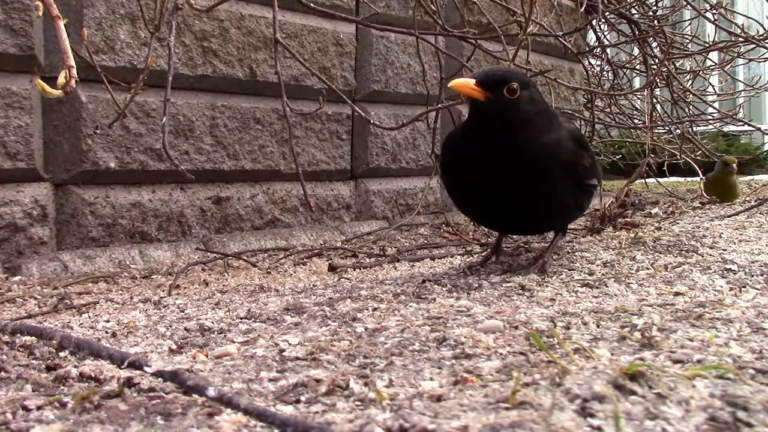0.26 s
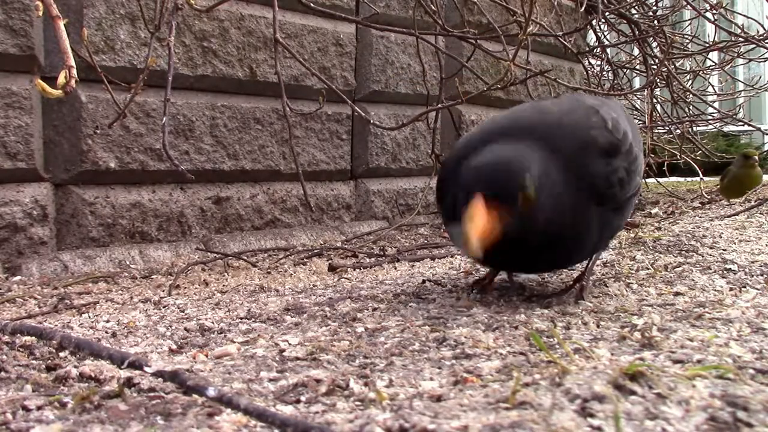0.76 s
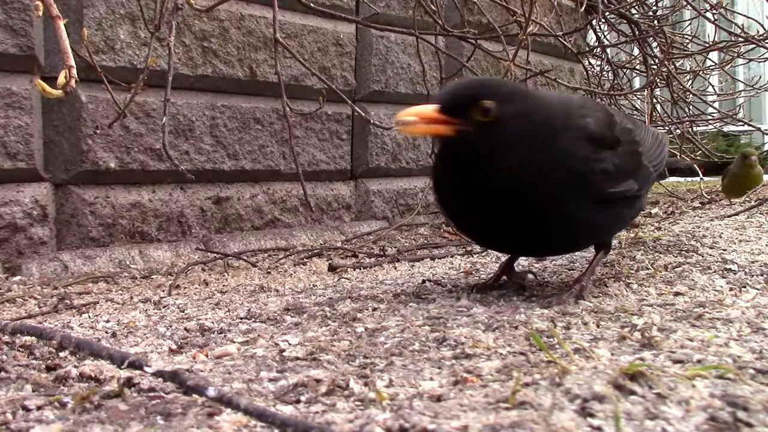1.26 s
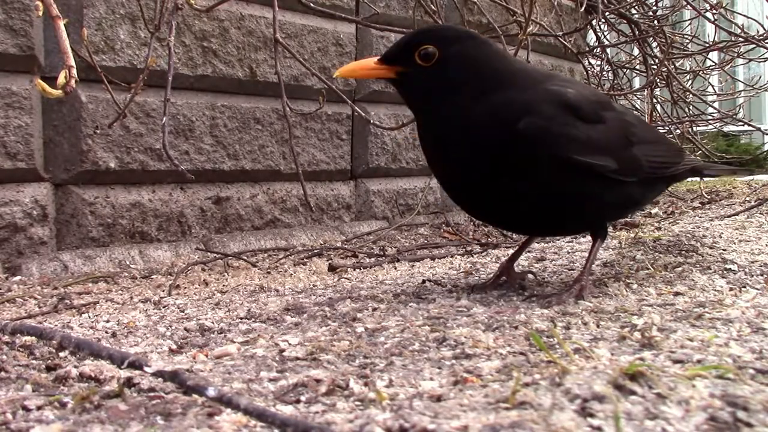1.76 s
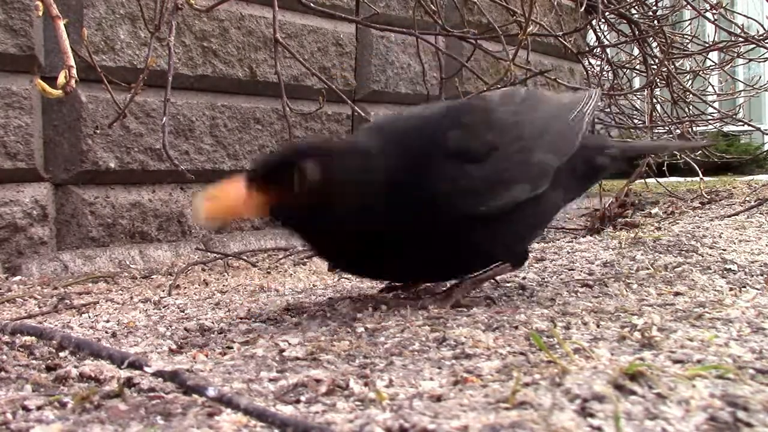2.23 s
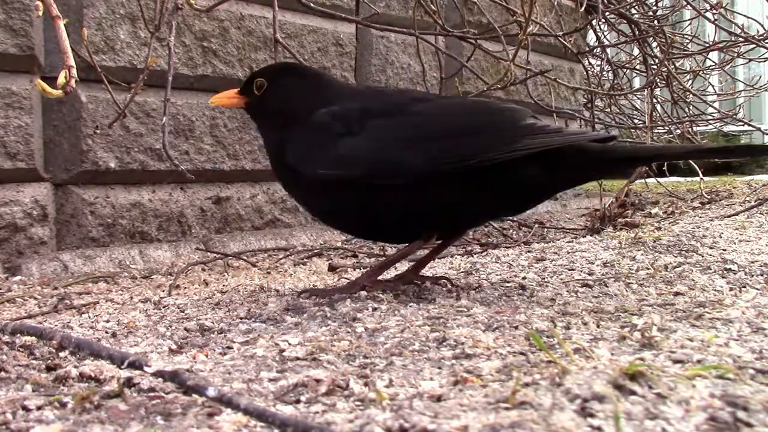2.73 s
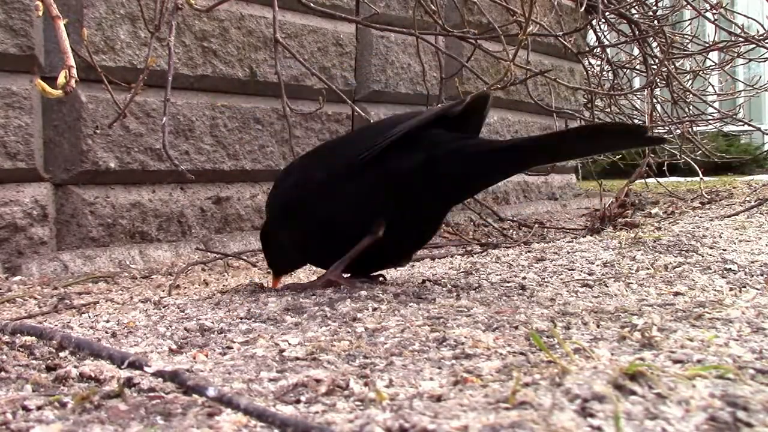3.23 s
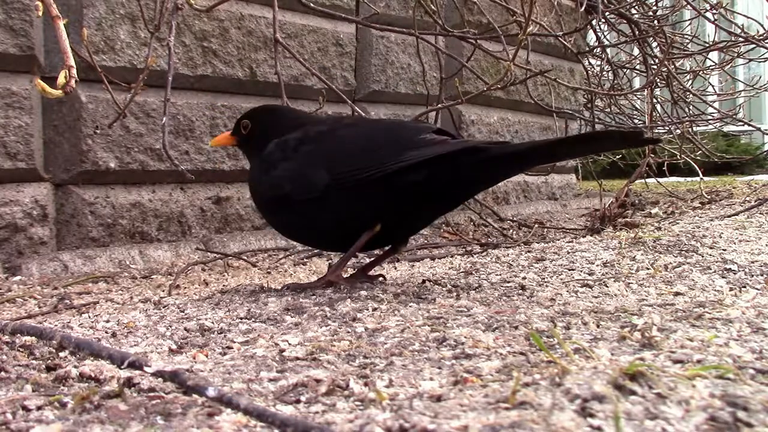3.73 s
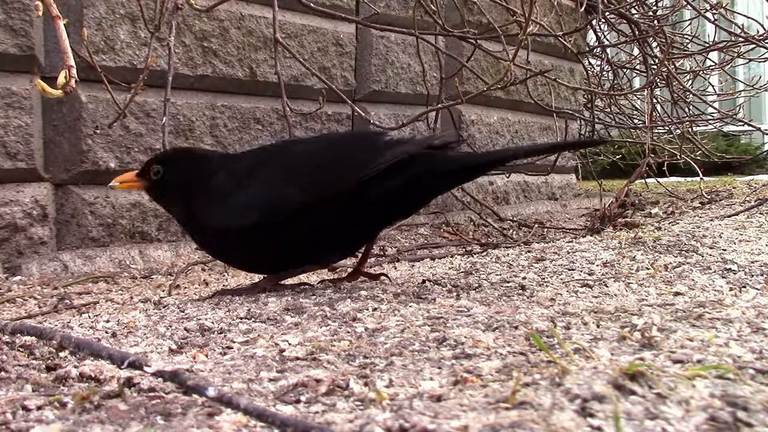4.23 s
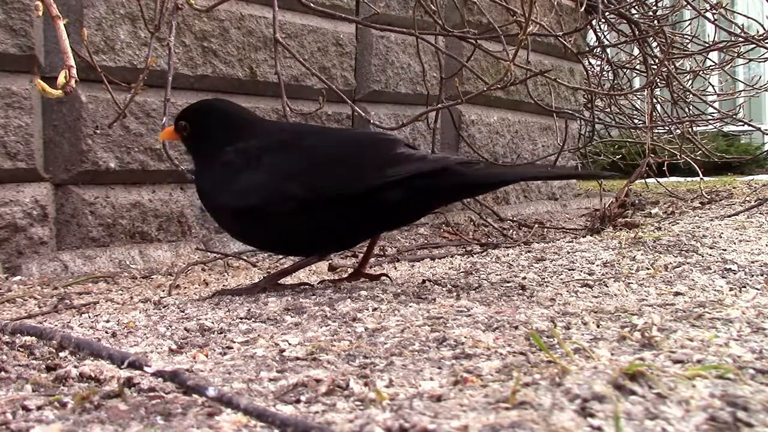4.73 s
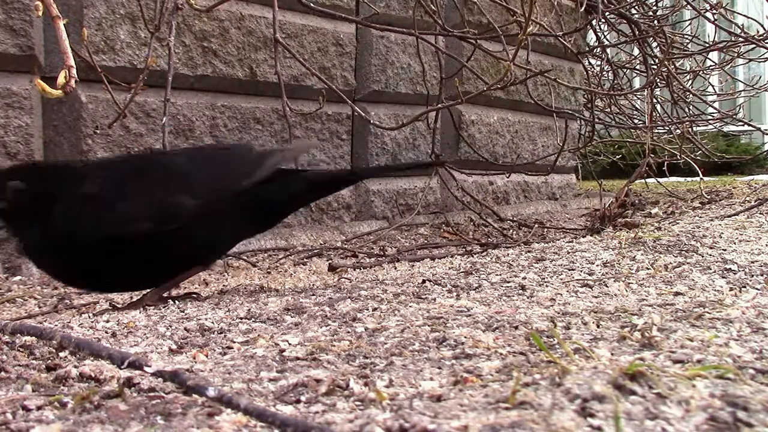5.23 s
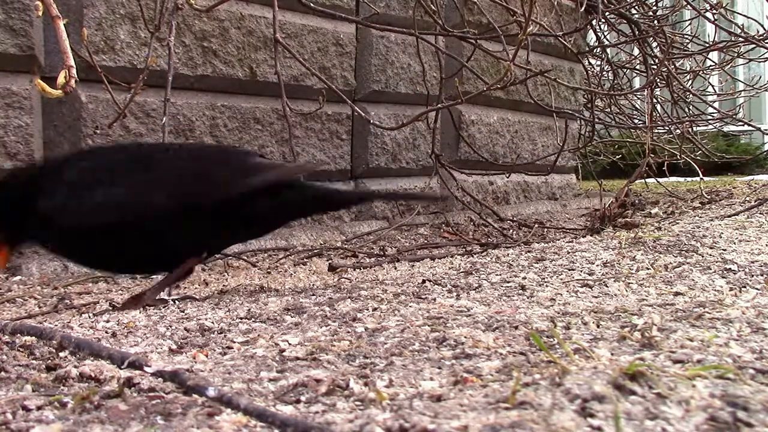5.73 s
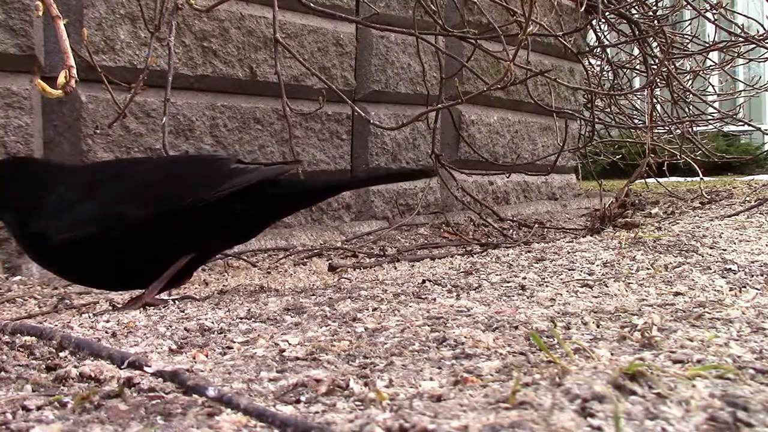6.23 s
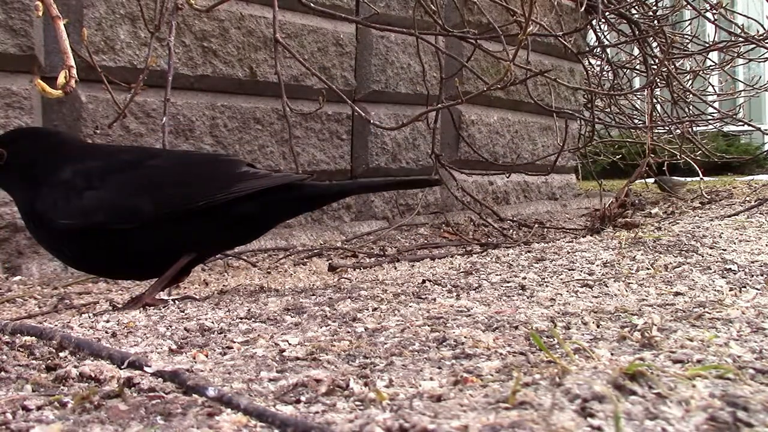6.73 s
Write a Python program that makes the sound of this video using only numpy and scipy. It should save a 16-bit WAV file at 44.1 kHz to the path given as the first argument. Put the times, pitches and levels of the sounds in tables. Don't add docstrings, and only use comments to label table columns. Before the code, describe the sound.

A blackbird pecks at gravel with sharp, ringing clicks and gritty scuffs while small birds whistle and call hoarsely over a low hum and rumble.

```python
import sys
import numpy as np
from scipy import signal
from scipy.fft import rfft, irfft, next_fast_len
from scipy.io import wavfile
from scipy.ndimage import uniform_filter1d

SR = 44100
rng = np.random.default_rng(int(sys.argv[2]) if len(sys.argv) > 2 else 0)


def magnitude_from_level(level_db):
    exponent = np.asarray(level_db, float) / 20
    return 10 ** exponent


def transcribe(u):
    v = np.clip(np.atleast_2d(u).T, -1, 1)
    q = np.round(v * 32767).astype(np.int16)
    wavfile.write(sys.argv[1], SR, q)


N = 307509
SIZE = next_fast_len(N)
BINS_HZ = np.maximum(np.fft.rfftfreq(SIZE, 1 / SR), 1)
WALL_S = .0023


def curve(table):
    return np.interp(np.arange(N) / SR, *np.transpose(table))


def on_log_axis(table, hz):
    at, value = np.transpose(table)
    return np.interp(np.log(hz), np.log(at), value)


def unit(x):
    return x / np.sqrt(np.mean(x ** 2))


def walk(rate, count=N):
    hold = int(SR / rate)
    steps = np.repeat(rng.standard_normal(count // hold + 1), hold)
    slewed = uniform_filter1d(uniform_filter1d(steps, hold), hold)
    return 1.566 * slewed[:count]


def sound_band(x, hz, width):
    return signal.lfilter(*signal.iirpeak(hz, hz / width, fs=SR), x)


def late(x, s):
    n = np.arange(len(x))
    return np.interp(n - s * SR, n, x, left=0)


def add(out, x, s, pan_db, lag=0):
    whole = int(np.floor(lag))
    left = x
    if lag > whole:
        left = np.convolve(x, np.sinc(np.arange(-8, 9) - lag + whole), "same")
    sides = [(left, magnitude_from_level(pan_db / 2), whole), (x, magnitude_from_level(-pan_db / 2), 0)]
    for channel, (y, gain, delay) in enumerate(sides):
        i = int(s * SR) + delay
        out[channel, i:i + len(y)] += gain * y[:N - i]


def yard(x, t60, wet_db, spread_s):
    t = np.arange(int(t60 * SR)) / SR
    tail = rng.standard_normal((2, len(t))) * magnitude_from_level(-60 * t / t60) * (1 - np.exp(-t / spread_s))
    tail /= np.sqrt(np.sum(tail ** 2, axis=1, keepdims=True))
    return x + magnitude_from_level(wet_db) * signal.fftconvolve(x, tail, axes=1)[:, :N]


def glide(length, start_hz, mid_hz, end_hz):
    u = np.linspace(0, 1, int(length * SR))
    start = 2 * start_hz * (u - .5) * (u - 1)
    middle = -4 * mid_hz * u * (u - 1)
    end = 2 * end_hz * u * (u - .5)
    return u, start + middle + end


def note(length, hz, contour):
    contours = {"dive": (1.68, .72), "drop": (1.19, .88), "soar": (.84, 1.17), "cap": (.85, .89),
                "plunge": (1.3, .87), "fall": (1.13, .92), "sag": (1.06, .96), "hook": (1.2, 1.0),
                "droop": (1.0, .87), "dip": (1.05, 1.03), "held": (.99, .99), "creep": (.98, 1.03),
                "scoop": (.93, 1.01), "lift": (.95, 1.13), "rise": (.86, 1.1), "climb": (.79, 1.03),
                "bow": (.94, .94), "arch": (.82, .75), "vault": (.64, .76), "hump": (.66, .84),
                "swell": (.94, 1.05)}
    start, end = contours[contour]
    return glide(length, start * hz, hz, end * hz)


def fan():
    # (t/s, level/dB)
    fan_level = [(0, -48), (.4, -49), (1.1, -37), (2.5, -35), (3.75, -47.5), (4.0, -66), (4.4, -63),
                 (4.7, -45), (5.4, -45.5), (5.6, -58.5), (6.3, -45.5), (6.6, -57), (6.97, -56)]
    # (t/s, f/Hz)
    blade_pitch = [
        (0, 109),
        (1.1, 107.8),
        (2.5, 105.9),
        (4.7, 106.4),
        (6.97, 107.9),
    ]
    phase = 2 * np.pi * np.cumsum(curve(blade_pitch)) / SR
    level = magnitude_from_level(curve(fan_level) + 0.097 * walk(5.3))
    return np.sqrt(2) * level * (np.sin(phase) + magnitude_from_level(-33.5) * np.sin(2 * phase))


def pair(gain):
    # (f/Hz, left-right correlation)
    likeness = [(20, 1), (130, 0.95), (200, 0.98), (300, 0.44), (2000, 0.47), (5000, 0.2)]
    like = np.clip(on_log_axis(likeness, BINS_HZ), 0, 1)
    mid, side = rfft(rng.standard_normal((2, SIZE))) * gain
    both = np.sqrt(1 + like) * mid + np.sqrt(1 - like) * side * np.array([[1], [-1]])
    return irfft(both, SIZE)[:, :N] / np.sqrt(2)


def town():
    # (f/Hz, width/Hz, level/dB)
    ducts = [
        (80.2, 22, -56),
        (137.9, 50, -50.5),
        (176.3, 13, -58.5),
        (214.8, 14, -60.5),
        (245.3, 48, -60),
        (455, 31, -75),
    ]
    # (f/Hz, level/dB per Hz)
    air_spectrum = [(20, -103), (60, -77), (300, -88), (600, -91.5), (2000, -99), (4000, -103),
                    (8000, -113), (12000, -110), (15900, -111), (16100, -140)]
    # (t/s, level/dB)
    swell = [
        (0, 0.5),
        (1.6, 5),
        (3, 3),
        (4.5, 0),
        (6.97, 1.5),
    ]
    rumble = 0
    for hz, width, db in ducts:
        resonance = 1 / (1 + (2 * (BINS_HZ - hz) / width) ** 2)
        rumble = rumble + magnitude_from_level(db + 1.3 * walk(2.956)) * unit(pair(resonance))
    hiss, breeze = 0, walk(0.84)
    colour = magnitude_from_level(on_log_axis(air_spectrum, BINS_HZ)) * np.sqrt(SR / 2)
    for octave in range(10):
        share = np.cos(np.pi / 2 * np.clip(np.log2(BINS_HZ / 30) - octave, -1, 1))
        hiss = hiss + magnitude_from_level(.3 * breeze + .6 * walk(14)) * pair(colour * share)
    return magnitude_from_level(curve(swell)) * rumble + hiss


def flock(count=420):
    # (t/s, level/dB)
    chatter = [(0, -73.5), (1.3, -59.5), (1.8, -71.5), (2.4, -80), (3.1, -68), (3.5, -71), (4.0, -66),
               (4.8, -60), (5.1, -61), (5.6, -61), (6.3, -89), (6.97, -95)]
    out = np.zeros((2, N))
    for s, a, b, size, pan in rng.random((count, 5)):
        start_hz, end_hz = 1800 + 2600 * a * a, 1800 + 2600 * b
        mid_hz = 1800 + 1300 * (a * a + b)
        u, hz = glide(0.01142 + 0.0249 * size, start_hz, mid_hz, end_hz)
        chirp = np.sin(np.pi * u) * np.sin(2 * np.pi * np.cumsum(hz) / SR)
        add(out, chirp, s * (N / SR - .05), 12 * (pan - .5))
    return magnitude_from_level(curve(chatter)) * unit(yard(out, 0.5, 13.0, 0.0059))


def ticks():
    # (t/s, peak level/dB, pebble ring minus peak/dB, top treble minus peak/dB, ring f/Hz)
    pecks = [(0.0217, -37, 7, -4, 2700), (0.0466, -17.5, 6.5, 3, 3400), (0.2006, -51, 22.5, -14, 2860),
             (0.9031, -26, 1, -17, 2770), (1.2653, -24.5, 4, -16, 3230), (1.6126, -46, 7, -5, 3000),
             (1.6175, -39.5, -9, 2, 3000), (1.6309, -37.5, 11.5, 4, 3100), (1.6997, -30.5, -28, -26, 4800),
             (2.3746, -24, 0.5, -20, 3100), (2.6216, -28, -9, -34, 3700), (2.6242, -29.5, 1, -32, 3900),
             (2.6696, -39, -12, -17, 3600), (3.4288, -39.5, 13.5, -24, 2970), (3.4344, -33, 4, -2, 3070),
             (3.6211, -41, 10, -14, 3100), (3.6268, -39, 10, 9.5, 2940), (3.629, -29, 1, -18, 3030),
             (4.1904, -31.5, 3, -24, 3100), (4.2017, -17.5, 3.5, -1, 3320), (4.3978, -58, 24, 24.5, 2320),
             (4.503, -44, 3.5, -23, 2600), (4.5593, -68.5, 35.5, 15, 2820), (5.0635, -40, 3.5, -25, 2650),
             (5.2238, -30.5, 5.5, -14, 2850), (5.4552, -34.5, -7, 1, 3200), (5.9445, -53, 13.5, 11, 3000),
             (6.0552, -33.5, 3.5, -29, 2950), (6.267, -36.5, 7, -25, 3770), (6.3317, -32, -1, -17, 3620)]
    debris = {"twig": (-4, -20), "sand": (-0.75, 1), "stone": (14, 1), "husk": (-10, 18.4),
              "shell": (16.8, -20)}
    # (t/s, peak level/dB, kind)
    grit = [(0.3706, -44, "twig"), (0.6021, -58, "sand"), (0.8059, -48.5, "sand"), (0.823, -51, "sand"),
            (1.7471, -48, "twig"), (1.79, -45, "sand"), (1.8037, -44, "sand"), (2.3422, -48, "sand"),
            (2.4747, -61.5, "husk"), (3.147, -53, "sand"), (3.1858, -46, "twig"), (3.233, -47, "twig"),
            (3.279, -50, "twig"), (3.3373, -54, "twig"), (3.6783, -42.5, "twig"), (3.7028, -46, "twig"),
            (3.717, -45, "twig"), (3.73, -47, "twig"), (3.78, -49, "twig"), (4.128, -65, "husk"),
            (4.227, -58, "stone"), (4.3807, -55, "stone"), (4.9078, -56, "stone"), (5.478, -51, "stone"),
            (0.1, -66, "husk"), (0.21, -60, "shell"), (5.138, -52, "twig"), (5.5142, -53, "stone"),
            (6.0042, -58, "sand"), (6.0438, -51.5, "stone"), (6.5894, -59, "husk"), (1.2608, -35, "sand"),
            (1.4987, -44.5, "twig"), (1.7044, -54, "shell"), (2.642, -44, "twig"), (2.8648, -57, "shell"),
            (2.91, -48.5, "twig"), (3.398, -59, "sand"), (3.593, -57, "shell"), (3.9395, -73, "husk"),
            (4.183, -45.5, "shell"), (4.3993, -58, "husk"), (4.401, -59, "husk"), (4.403, -66, "husk"),
            (5.391, -50, "twig"), (5.4524, -47, "shell"), (6.0517, -36.5, "twig"), (6.263, -50, "shell"),
            (6.227, -71, "husk")]
    # (t/s, delay of the left microphone/samples)
    stance = [
        (0, 1.8),
        (0.9, 2.3),
        (1.6, 1.7),
        (2.4, 1.6),
        (2.62, 1),
        (3.4, 0.2),
        (4.2, -0.2),
        (4.4, 0.3),
        (5.2, -1.4),
        (6.97, -1.25),
    ]
    grit_ring_hz = 3100
    chips_ms, crunch_s = 0.38, .002
    ground_s = .0002
    out, t = np.zeros((2, N)), (np.arange(600) - 90) / SR
    contacts = list(pecks) + [(s, db, *debris[kind], grit_ring_hz) for s, db, kind in grit]
    chance, bearing = rng.standard_normal((len(contacts), 600)), curve(stance)
    for (s, db, ring_db, top_db, ring_hz), c in zip(contacts, chance):
        hard = db > -21
        grains = c ** 2 * np.sign(c)
        blow = (.05 if hard else .16) * grains * np.exp(-(1000 * t / chips_ms) ** 2)
        blow += (0 if hard else .07) * grains * (t > 0) * np.exp(-np.abs(t) / crunch_s)
        blow[90] = -1.1
        crack = sound_band(blow, *((7400, 2200) if hard else (4900, 3000)))
        low_hz, high_hz = (13000, 12000) if top_db > 12 else (9500, 8800)
        treble = sound_band(sound_band(blow, low_hz, 8200), high_hz, 21000)
        ring = sound_band(sound_band(blow, ring_hz, 1700 if hard else 1000), ring_hz, 4500)
        layers = [(0, crack), (top_db + 2.5, treble), (ring_db - 5, ring)]
        x = sum(magnitude_from_level(gain_db) * layer / np.abs(layer).max() for gain_db, layer in layers)
        x = x - (.75 if hard else .15) * late(x, ground_s * (1 + .015 * c[2]))
        lag = bearing[int(s * SR)]
        start = s - 97 / SR
        add(out, magnitude_from_level(db + 1.5) * x, start, .7 - 2.7 * lag, lag)
        echo = np.convolve(x, c[-24:] / 5)[:len(x)]
        add(out, magnitude_from_level(db - (18 if hard else 11)) * echo, start + WALL_S * (1 + .1 * c[1]), 3, -2)
    return yard(out, .012, -24, .001)


def scuffs():
    # (t/s, peak level/dB, centre f/Hz, air thump minus peak/dB)
    beats = [(3.935, -42.5, 870, 0), (3.981, -44, 1530, -10), (4.07, -47, 1700, -13),
             (4.098, -39, 1150, -8), (4.125, -42.5, 856, -13), (4.146, -35.5, 1080, 6),
             (4.179, -40.5, 900, -6), (4.227, -40.5, 1230, 1), (4.272, -47.5, 1340, -1),
             (4.307, -48.5, 855, -13), (4.34, -55, 1100, -13), (5.645, -46.5, 1500, -1),
             (5.922, -48, 1214, 1), (5.969, -52.5, 501, 6), (6, -51, 1750, 8)]
    # (t/s, peak level/dB, centre f/Hz)
    footfalls = [(0.0458, -38, 1080), (0.2, -47, 1500), (5.138, -50, 1200), (5.168, -49, 1050),
                 (0.82, -43.5, 1360), (0.905, -38.5, 750), (1.326, -47, 1760), (1.785, -44.5, 549),
                 (5.061, -40, 1320), (5.282, -45, 800), (5.538, -44, 900), (5.609, -43, 1550),
                 (2.721, -49, 1300), (3.433, -39.5, 1100), (5.315, -39, 770), (5.448, -49, 977),
                 (5.474, -37, 580), (5.511, -32.5, 1000), (5.582, -41, 950), (5.626, -38.5, 877),
                 (6.328, -40.5, 1680)]
    beat_s, scuff_s = 0.012, 0.00374
    wings, feet, air = np.zeros((2, N)), np.zeros((2, N)), np.zeros((2, N))
    t = np.arange(6000) / SR
    puffs = [(wings, *row[:3], beat_s, 1.3, -15) for row in beats]
    puffs += [(feet, *row, scuff_s, 1.7, -19) for row in footfalls]
    chance = rng.standard_normal((len(puffs), 6000))
    for (out, s, db, hz, length, coarse, hiss_db), c in zip(puffs, chance):
        shape = t / length * np.exp(1 - t / length)
        grains = c * (np.abs(c) > coarse)
        body = unit(sound_band(sound_band(grains, hz, 1.1 * hz), .7 * hz, 1.6 * hz))
        hiss = unit(sound_band(c * np.abs(c), 12700, 4500))
        rustle = body + 0.3 * late(body, WALL_S) + magnitude_from_level(hiss_db) * hiss
        add(out, magnitude_from_level(db - 9.5) * shape * rustle, s - length / 2, -1.2)
    thump = np.sin(2 * np.pi * 62 * t) * np.sin(np.pi * np.minimum(t / 0.039, 1))
    for s, db, _, thump_db in beats:
        add(air, magnitude_from_level(db + thump_db - 4.5) * thump, s - .01, 0)
    return yard(wings, .16, -1.1, 0.031) + yard(feet, .1, -10.5, 0.0076) + air


def whistles(notes, pan_db, rough, twigs_db):
    out, fade = np.zeros((2, N)), magnitude_from_level(-60 * np.arange(2000) / SR / .05)
    wobble, flutter = walk(200), walk(150)
    twigs = rng.standard_normal((len(notes), 2000)) * fade
    for (s, length, mid_hz, db, contour), scatter in zip(notes, twigs):
        u, hz = note(length, mid_hz, contour)
        here = slice(int(s * SR), int(s * SR) + len(u))
        brief = rough * min(.04 / length, 1) ** 1.5
        shape = np.clip(np.sin(np.pi * u ** .8), 0, 1) ** .35 * magnitude_from_level((2.2 + 1.5 * brief) * flutter[here])
        pitch = hz * (1 + .02 * brief * wobble[here])
        tone = shape * np.sin(2 * np.pi * np.cumsum(pitch) / SR)
        blur = signal.fftconvolve(tone, scatter)
        blur *= magnitude_from_level(twigs_db) * brief * np.linalg.norm(tone) / np.linalg.norm(blur)
        blur[:len(tone)] += tone
        level = magnitude_from_level(db + 2.5) * np.sqrt(len(u)) / np.linalg.norm(blur)
        add(out, level * blur, s, pan_db, lag=-int(pan_db / 3))
    return yard(out, .3, -7, .012)


def singers():
    # (t/s, length/s, middle f/Hz, level/dB, contour); first a warbled phrase ahead
    warbled = [(0.058, 0.0081, 3700, -72, "rise"), (0.066, 0.015, 3800, -62, "fall"),
               (0.078, 0.023, 3610, -62, "held"), (0.098, 0.023, 3520, -61, "fall"),
               (0.122, 0.011, 3930, -66, "rise"), (0.15, 0.048, 4320, -69, "held"),
               (0.224, 0.0095, 3690, -56, "rise"), (0.232, 0.019, 3430, -56, "drop"),
               (0.262, 0.029, 2960, -59, "held"), (0.328, 0.019, 5000, -71, "arch"),
               (0.377, 0.0076, 3350, -59, "rise"), (0.383, 0.021, 3400, -56, "fall"),
               (0.416, 0.011, 2950, -61, "rise"), (0.426, 0.019, 2940, -60, "sag"),
               (0.484, 0.017, 3870, -59, "soar"), (0.519, 0.013, 5200, -73, "fall"),
               (0.533, 0.025, 3360, -54, "fall"), (0.566, 0.028, 3000, -59, "fall"),
               (0.61, 0.03, 2900, -74, "held"), (0.625, 0.074, 4550, -72, "held"),
               (0.634, 0.023, 4140, -64, "cap"), (0.722, 0.0204, 3470, -55, "cap"),
               (0.743, 0.017, 3790, -57, "lift"), (0.759, 0.018, 3140, -56.5, "plunge"),
               (0.779, 0.012, 2630, -62, "held"), (0.855, 0.016, 2520, -57.5, "sag"),
               (0.92, 0.033, 3460, -54, "soar"), (0.956, 0.025, 3100, -53.5, "plunge"),
               (0.98, 0.063, 2560, -62, "held"), (0.99, 0.013, 3750, -67, "held"),
               (1.02, 0.033, 2870, -63, "held"), (1.071, 0.015, 5000, -64, "soar")]
    ahead = [(2.31, 0.061, 2424, -63, "bow"), (2.38, 0.21, 2890, -73, "creep"),
             (2.571, 0.03, 2750, -64, "fall"), (2.032, 0.095, 2500, -74, "sag"),
             (2.867, 0.1, 1965, -62.5, "held"), (2.95, 0.032, 3950, -69, "soar"),
             (2.982, 0.025, 4550, -70, "held"), (3.019, 0.02, 4450, -75, "held"),
             (3.095, 0.11, 1935, -64, "dip"), (3.09, 0.01, 3400, -57, "sag"),
             (3.158, 0.0078, 3590, -65, "swell"), (3.162, 0.013, 3500, -49, "fall"),
             (3.25, 0.0076, 3430, -52, "swell"), (3.253, 0.013, 3334, -49.5, "sag"),
             (3.313, 0.097, 1970, -65.5, "sag"), (3.587, 0.1, 4130, -56, "creep"),
             (3.686, 0.094, 2060, -67.5, "dip"), (3.978, 0.04, 3830, -51.5, "plunge"),
             (4.014, 0.045, 3106, -50.5, "sag"), (4.232, 0.015, 3030, -60, "fall"),
             (4.24, 0.017, 3040, -59, "bow"), (4.242, 0.01, 3630, -61, "sag"),
             (4.119, 0.015, 3890, -60, "lift"), (4.272, 0.01, 2550, -60, "held"),
             (4.41, 0.054, 2890, -65, "held"), (4.519, 0.008, 4350, -65, "held"),
             (4.555, 0.015, 3100, -66, "soar"), (4.565, 0.017, 3796, -61, "cap"),
             (4.604, 0.017, 2940, -60.5, "held"), (4.708, 0.018, 2460, -61, "sag"),
             (4.737, 0.017, 2110, -67, "drop"), (4.739, 0.012, 3300, -65, "held"),
             (4.869, 0.033, 4390, -70, "held"), (4.765, 0.026, 3300, -62, "creep"),
             (4.785, 0.019, 3710, -56, "swell"), (4.802, 0.022, 2850, -61, "drop"),
             (4.942, 0.03, 3050, -63, "lift"), (4.958, 0.04, 3390, -56, "bow"),
             (4.984, 0.0068, 3670, -60, "rise"), (5.666, 0.21, 4265, -55.5, "fall"),
             (5.88, 0.065, 4170, -74, "creep"), (5.899, 0.15, 4330, -73.5, "held"),
             (6.33, 0.096, 4070, -73.5, "creep")]
    on_left = [(3.02, 0.058, 1946, -68.5, "held"), (3.333, 0.019, 4260, -64, "arch"),
               (3.362, 0.0079, 4460, -70, "soar"), (3.49, 0.0064, 4170, -65, "soar"),
               (3.51, 0.018, 3800, -75, "sag"), (3.56, 0.012, 4760, -65, "soar"),
               (3.65, 0.1, 6400, -70, "held"), (3.462, 0.021, 4270, -61.5, "arch"),
               (3.575, 0.043, 4700, -59.5, "swell"), (3.742, 0.023, 4250, -56.5, "arch"),
               (3.757, 0.018, 4800, -60, "rise"), (3.775, 0.03, 4880, -60, "climb"),
               (3.776, 0.006, 4300, -56, "held"), (3.91, 0.0097, 4000, -62, "soar"),
               (3.805, 0.026, 4630, -60, "rise"), (3.79, 0.016, 3970, -62, "held"),
               (3.825, 0.023, 4560, -60.5, "rise"), (3.848, 0.022, 4500, -58.5, "rise"),
               (3.865, 0.054, 4480, -63, "held"), (3.882, 0.018, 4170, -57.5, "arch"),
               (4.072, 0.014, 3390, -60, "droop"), (4.267, 0.012, 3700, -59, "fall"),
               (4.284, 0.013, 3550, -63, "rise"), (4.352, 0.01, 3700, -67, "rise"),
               (4.362, 0.014, 2900, -67, "creep"), (4.378, 0.013, 3080, -61, "fall"),
               (4.4, 0.014, 3620, -61, "sag"), (4.3, 0.012, 3260, -62, "fall"),
               (4.445, 0.014, 3260, -62, "lift"), (4.592, 0.018, 2370, -68, "soar"),
               (4.61, 0.022, 2200, -68, "drop"), (4.455, 0.006, 3800, -68, "soar"),
               (4.685, 0.024, 3430, -65, "rise"), (5.626, 0.05, 4420, -67, "rise")]
    on_right = [(0.677, 0.01, 2920, -58.5, "plunge"), (0.686, 0.016, 2510, -62, "held"),
                (2.975, 0.054, 2150, -66, "scoop"), (2.965, 0.069, 3320, -65, "scoop"),
                (3.035, 0.023, 2890, -68, "held"), (3.066, 0.02, 2880, -74, "held"),
                (3.35, 0.2, 1370, -73, "bow"), (3.45, 0.23, 2037, -71, "held"),
                (3.2, 0.1, 1980, -72, "held"), (3.91, 0.069, 2064, -64, "sag"),
                (4.03, 0.024, 3450, -52, "held"), (4.3, 0.044, 2260, -66, "held"),
                (4.338, 0.067, 2270, -62, "creep"), (4.414, 0.039, 2260, -61.5, "sag"),
                (4.461, 0.014, 2190, -66, "held"), (4.715, 0.023, 3450, -58.5, "lift"),
                (4.805, 0.089, 2170, -69, "held"), (4.9, 0.028, 2520, -65, "held"),
                (4.99, 0.018, 2680, -64, "fall"), (5.11, 0.03, 1920, -72, "creep"),
                (5.142, 0.13, 2070, -64, "creep"), (5.42, 0.09, 2060, -65.5, "held"),
                (5.34, 0.045, 1850, -69, "creep"), (6.13, 0.1, 2670, -70, "bow"),
                (6.13, 0.08, 2210, -67.5, "held"), (6.57, 0.099, 2780, -66.5, "sag"),
                (6.575, 0.13, 2190, -64.5, "bow")]
    centre = whistles(warbled + ahead, -.6, 1, -5)
    return centre + whistles(on_left, 8, .55, -7) + whistles(on_right, -7, .7, -4)


def buzzes():
    # (t/s, length/s, middle f/Hz, level/dB, contour)
    calls = [(0.204, 0.029, 4800, -64, "fall"), (0.357, 0.023, 4960, -67, "fall"),
             (0.869, 0.11, 1620, -58, "lift"), (0.967, 0.16, 1521, -59.5, "held"),
             (1.081, 0.1, 1826, -67, "held"), (0.848, 0.35, 2090, -67.5, "held"),
             (1.114, 0.13, 3690, -51.5, "dive"), (1.334, 0.1, 3920, -53.5, "hump"),
             (1.44, 0.054, 2462, -57.5, "held"), (1.191, .02, 1785, -57, "held"),
             (1.32, .022, 2540, -59, "held"), (1.321, .014, 1660, -59, "held"),
             (1.318, .02, 7100, -70, "held"), (1.386, 0.019, 2560, -56, "held"),
             (1.387, 0.017, 1620, -58, "held"), (3.978, 0.017, 9230, -62, "sag"),
             (2.744, 0.034, 2950, -64, "held"), (5.336, 0.047, 2770, -62, "lift"),
             (5.655, 0.034, 2490, -61, "held"), (5.704, .022, 10000, -66, "sag"),
             (1.75, 0.19, 4250, -77, "held"), (2.75, 0.021, 4000, -66, "bow"),
             (2.88, 0.043, 4630, -59, "vault"), (5.158, 0.11, 3450, -55, "dive"),
             (5.374, 0.09, 4070, -57.5, "arch"), (5.685, 0.067, 5350, -66, "fall"),
             (6.347, 0.017, 2760, -62, "sag"), (6.733, 0.018, 2860, -53.5, "bow"),
             (6.739, 0.04, 3400, -66, "sag"), (6.744, 0.032, 5330, -65, "sag"),
             (6.732, 0.051, 4300, -64, "droop")]
    trill_hz = 212
    out = np.zeros((2, N))
    for s, length, mid_hz, db, contour in calls:
        u, hz = note(length, mid_hz, contour)
        warble = hz * (1 + .045 * walk(800, count=len(u)))
        pulses = 3.9 * np.sin(2 * np.pi * trill_hz * length * u)
        throb = magnitude_from_level(2.9 * walk(114.4, count=len(u)) + pulses)
        tone = np.sin(2 * np.pi * np.cumsum(warble) / SR)
        shape = np.clip(np.sin(np.pi * u), 0, 1) ** 0.33
        add(out, magnitude_from_level(db) * shape * throb * tone, s, -1.5)
    return yard(out, .16, -0.76, 0.0079)


def scene():
    blackbird = ticks() + scuffs()
    birds = singers() + buzzes() + flock()
    return blackbird + birds + fan() + town()


def top_cut(x):
    return signal.sosfilt(signal.butter(12, 16900, fs=SR, output="sos"), x)


def record(dry):
    trimmed = signal.sosfilt(signal.ellip(6, .3, 60, 16700, fs=SR, output="sos"), dry)
    return top_cut(trimmed)


dry = scene()
out = record(dry)
transcribe(out)
```